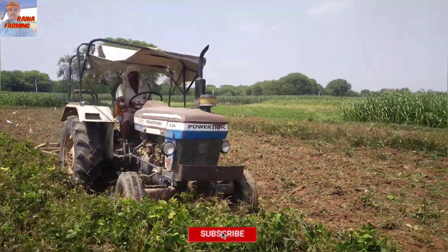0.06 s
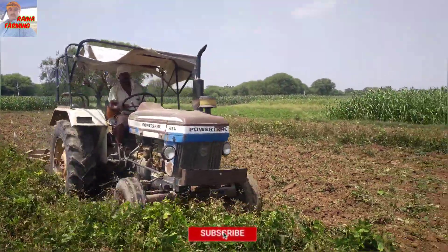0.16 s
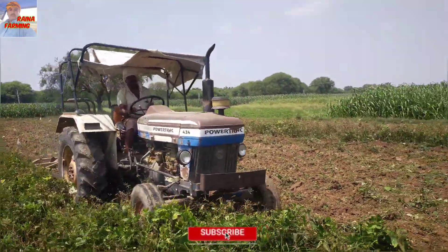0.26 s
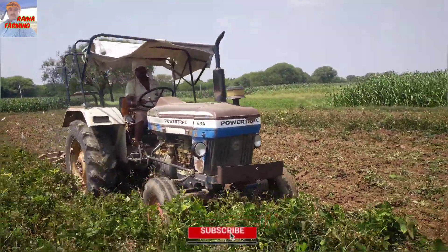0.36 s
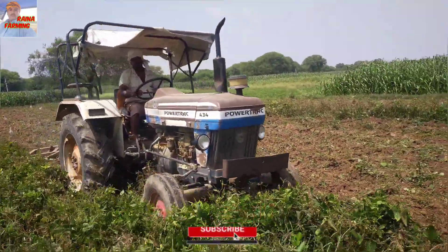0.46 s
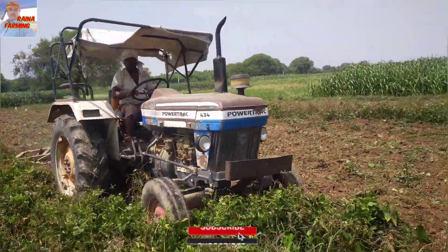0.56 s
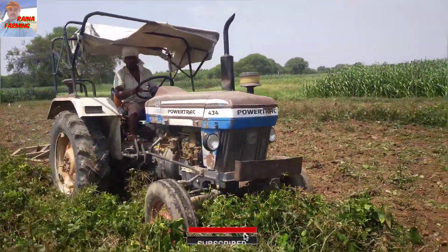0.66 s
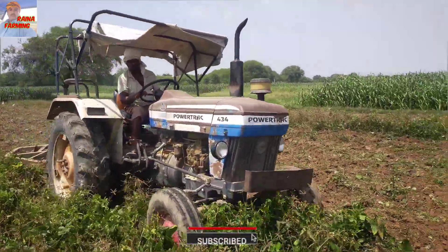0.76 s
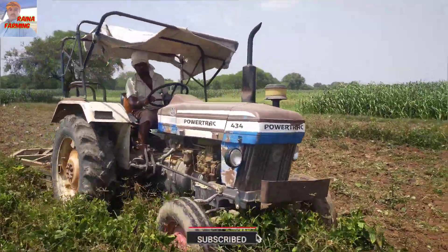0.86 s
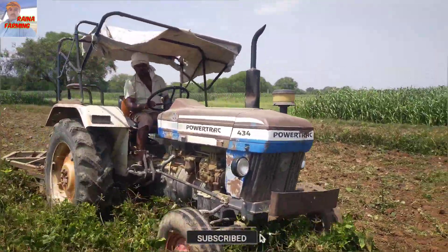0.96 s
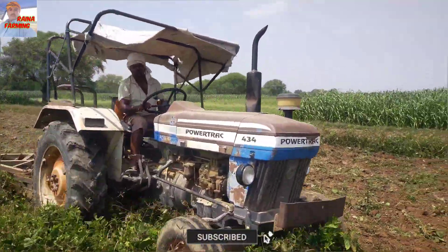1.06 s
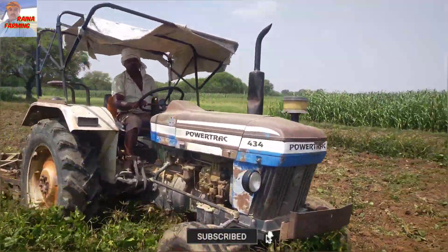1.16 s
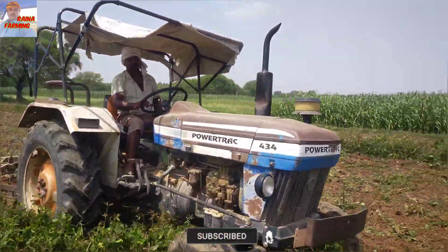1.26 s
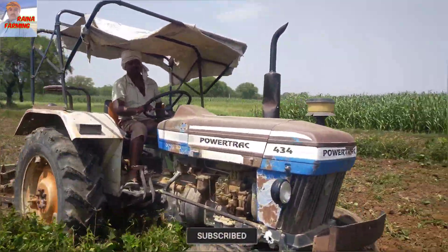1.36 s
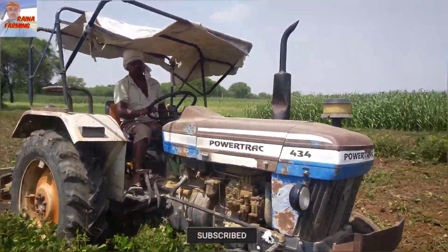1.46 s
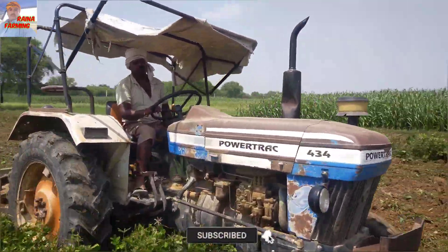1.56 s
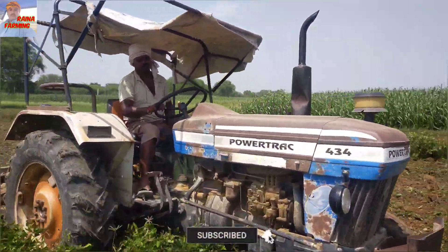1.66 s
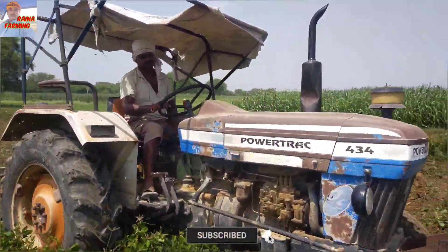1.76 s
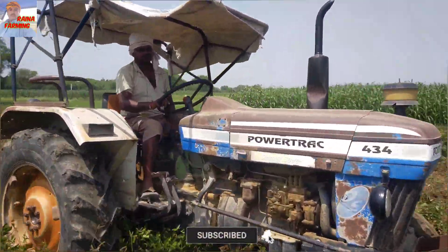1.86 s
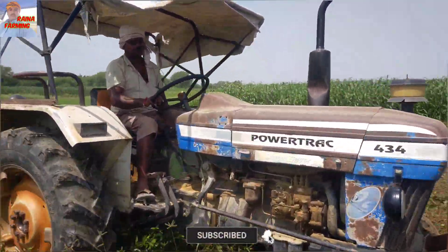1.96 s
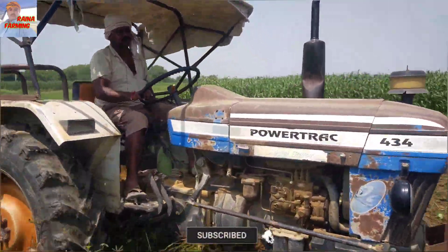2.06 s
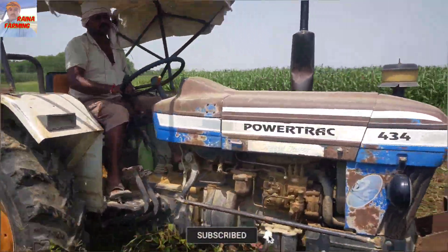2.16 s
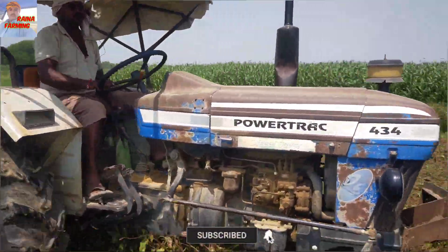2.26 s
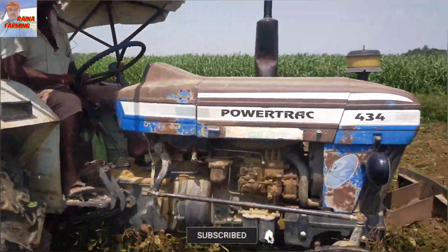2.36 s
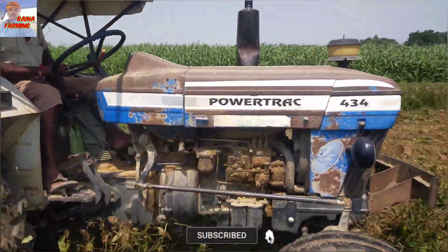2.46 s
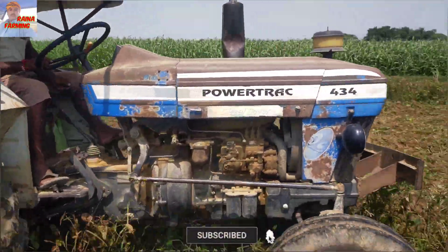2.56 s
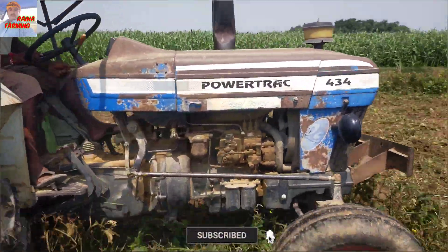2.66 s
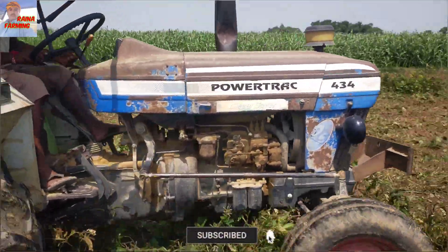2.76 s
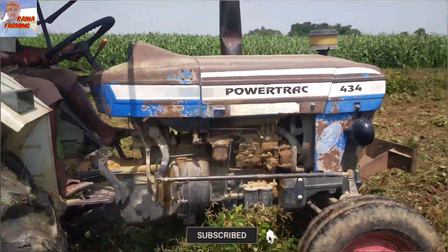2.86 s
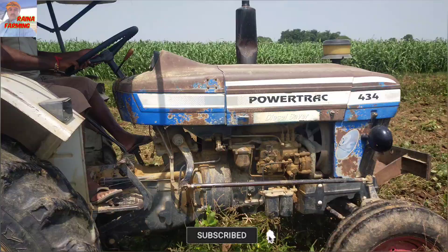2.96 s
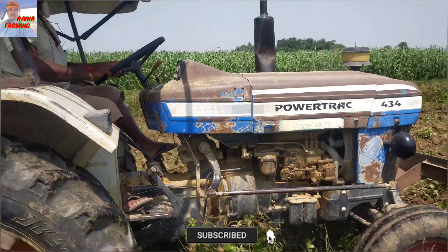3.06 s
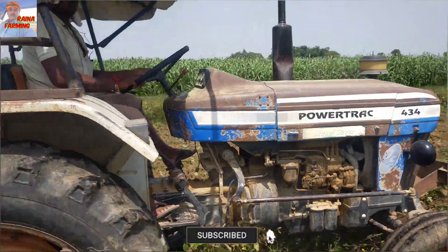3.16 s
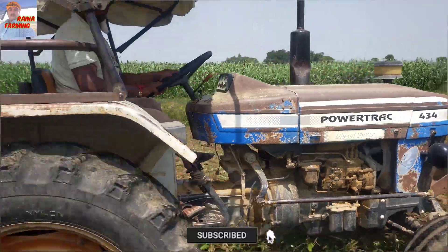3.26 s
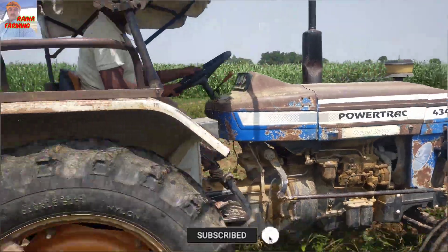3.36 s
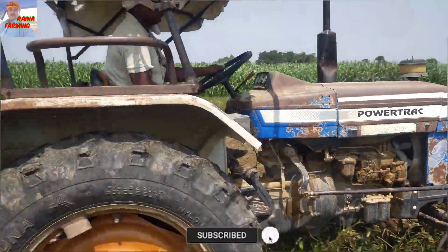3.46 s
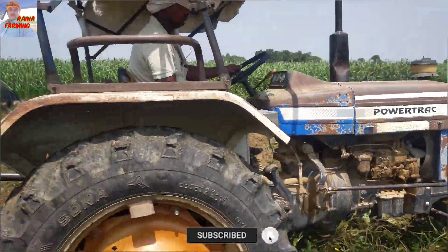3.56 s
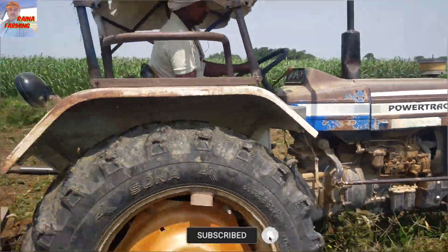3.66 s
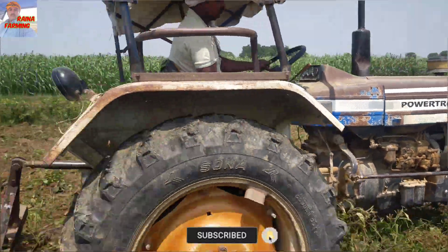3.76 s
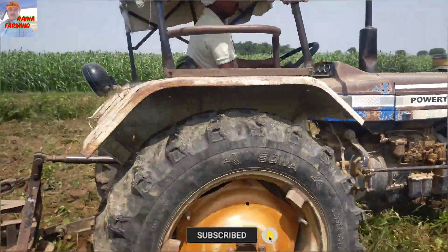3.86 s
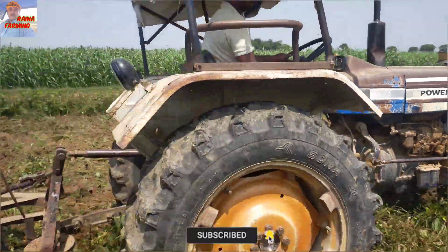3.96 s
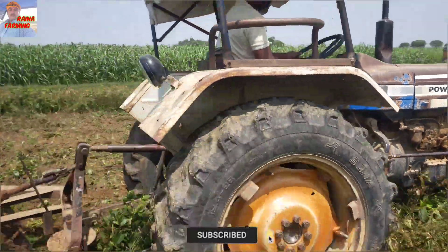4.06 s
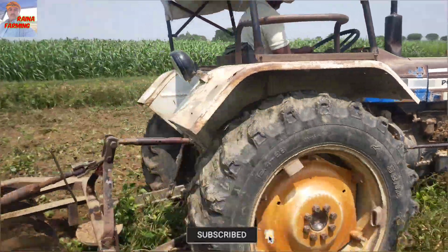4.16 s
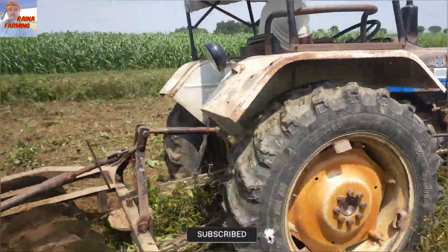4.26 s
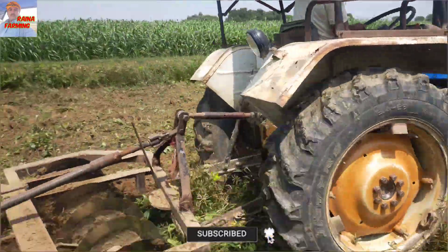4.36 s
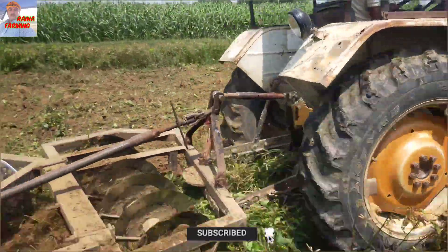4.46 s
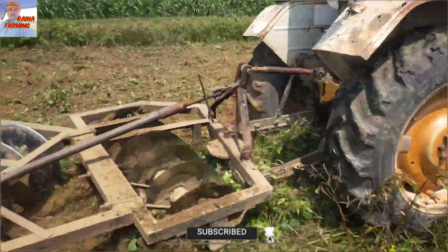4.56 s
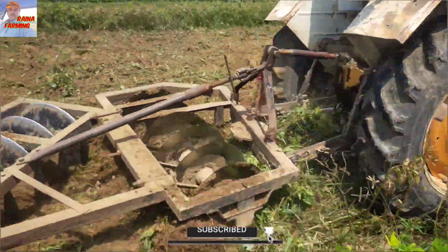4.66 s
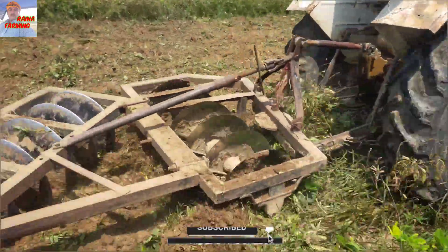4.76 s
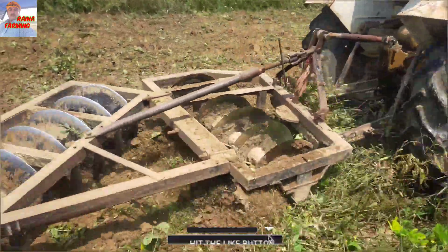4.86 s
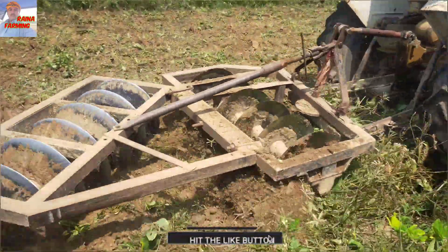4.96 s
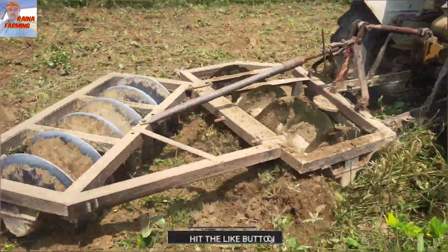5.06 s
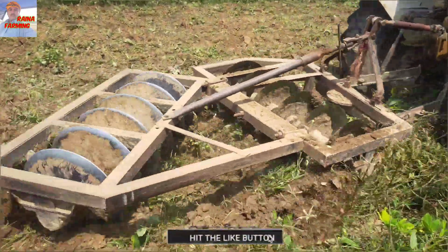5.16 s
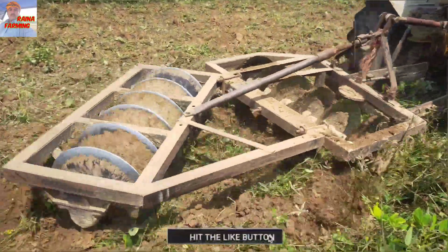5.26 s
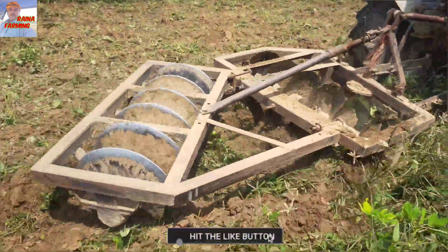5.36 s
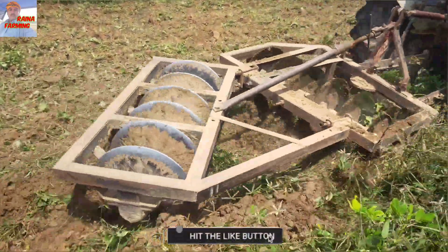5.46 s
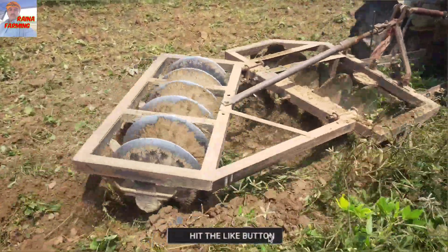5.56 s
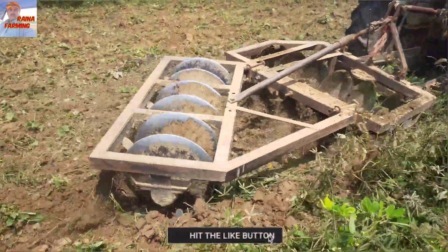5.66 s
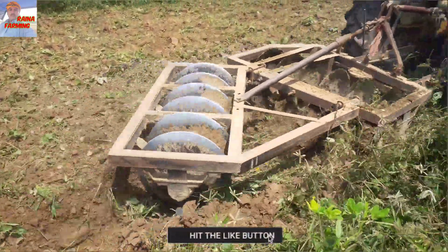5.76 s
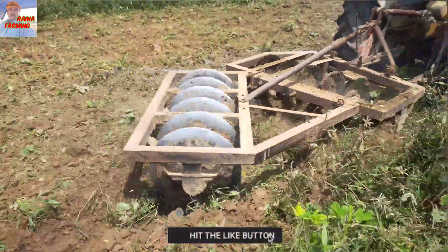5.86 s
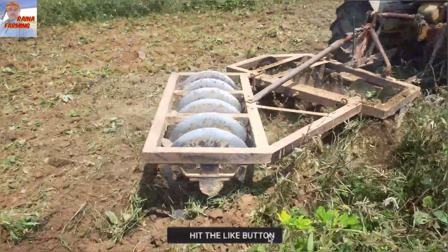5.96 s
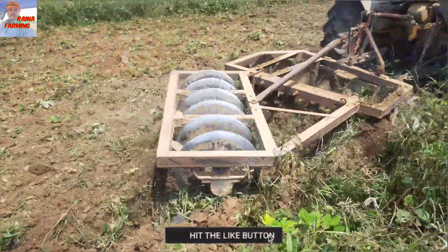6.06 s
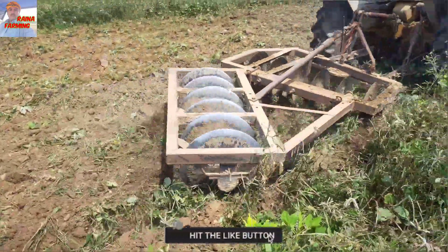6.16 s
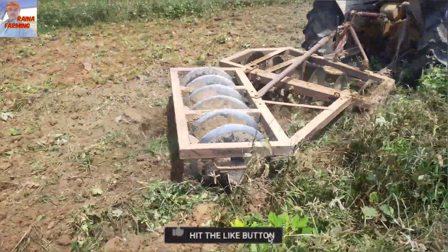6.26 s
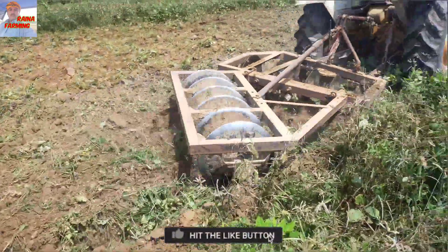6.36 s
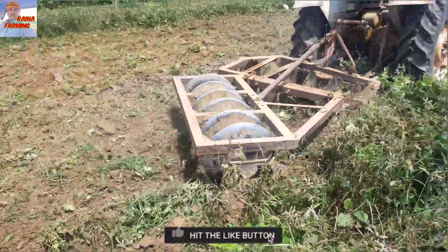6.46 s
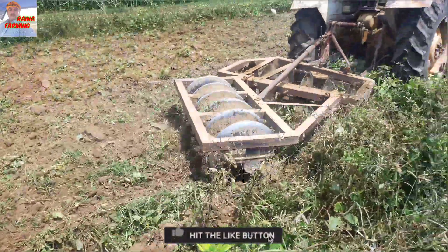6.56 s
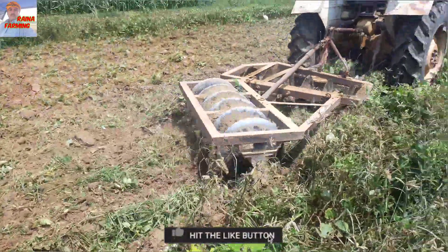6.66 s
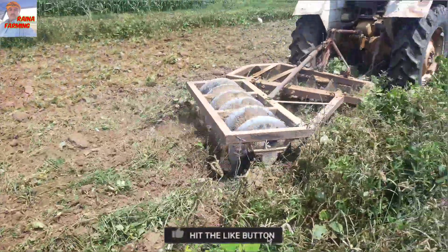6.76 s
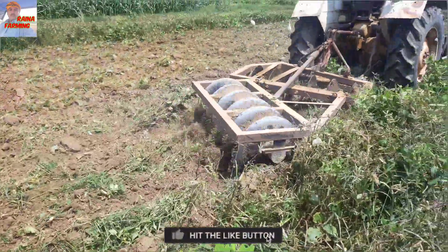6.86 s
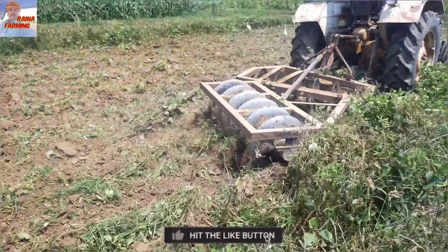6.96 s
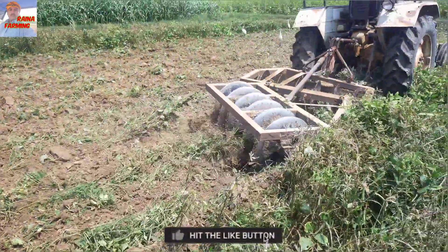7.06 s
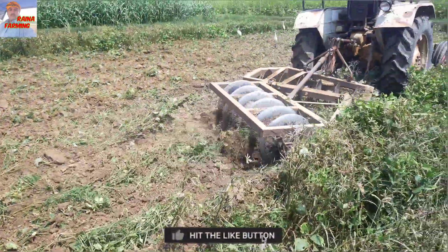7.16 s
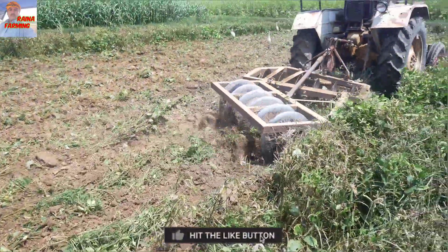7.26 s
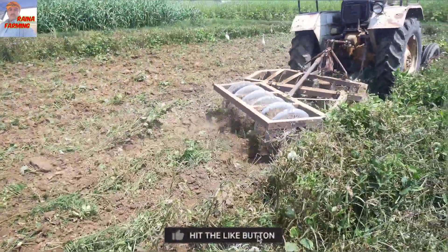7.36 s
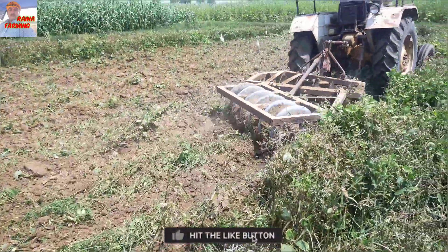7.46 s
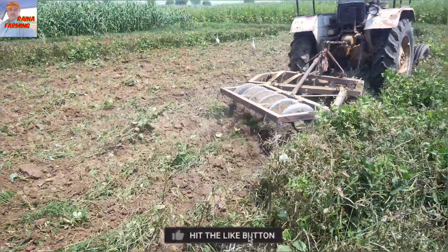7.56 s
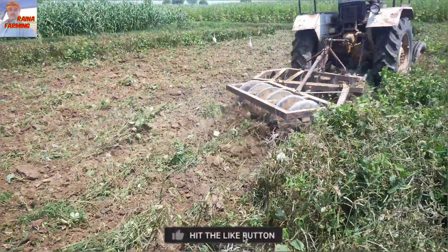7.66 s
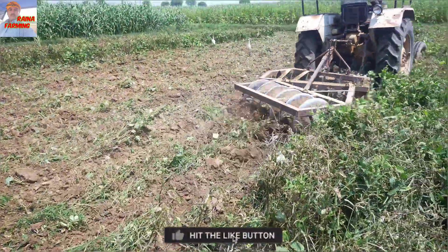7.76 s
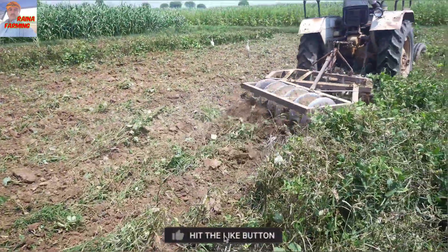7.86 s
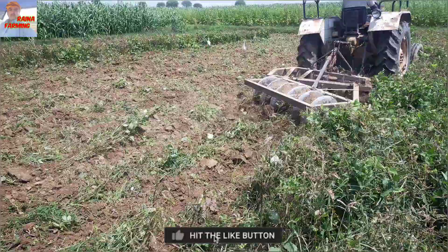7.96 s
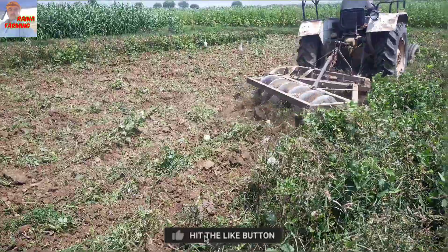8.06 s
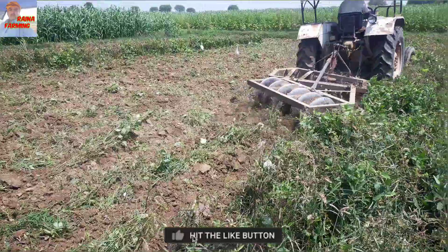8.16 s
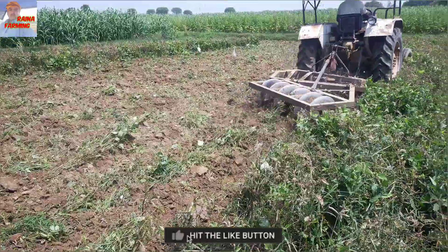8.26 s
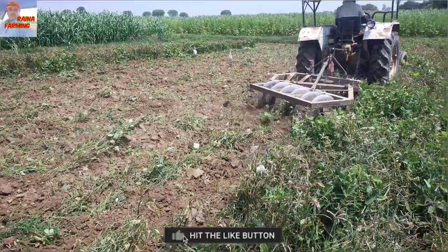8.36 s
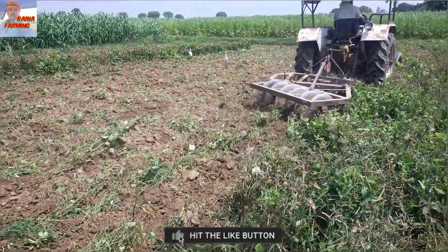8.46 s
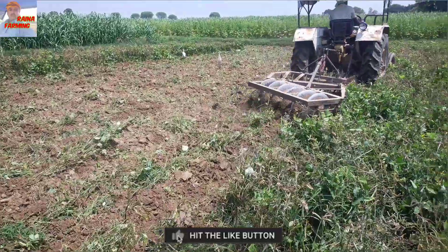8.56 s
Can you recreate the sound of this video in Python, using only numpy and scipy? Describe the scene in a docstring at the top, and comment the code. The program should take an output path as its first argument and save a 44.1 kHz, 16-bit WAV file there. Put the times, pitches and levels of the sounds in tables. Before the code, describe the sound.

A diesel tractor approaches across an open field at steady engine speed, its exhaust throbbing, its engine knocking rapidly and its gears whining. It passes close to the microphone with a little low wind buffeting. Behind it a disc harrow gives thin, high squeaks, clanks once on a stone and crumbles dry soil as the engine fades into the distance.

```python
"""A three-cylinder diesel tractor drives close past the microphone, pulling a disc harrow over dry soil.
Its exhaust throbs, the block knocks once per firing and the gears whine; the tone turns from nose to
flank to tail as it goes by. Behind it the discs crumble clods, a dry bearing squeaks thinly and one
disc clanks on a stone. Out in the open field, a little wind buffets the microphone."""
import sys
import numpy as np
from scipy import signal
from scipy.fft import rfft, irfft, next_fast_len
from scipy.io import wavfile
from scipy.ndimage import map_coordinates

SR = 44100
rng = np.random.default_rng(int(sys.argv[2]) if len(sys.argv) > 2 else 0)


def file_out(sig):
    """Save sig as 16-bit WAV at sys.argv[1]."""
    # one column per channel
    cols = np.atleast_2d(sig).T
    # limit, then scale
    lim = np.clip(cols, -1, 1)
    pcm = np.round(lim * 32767).astype(np.int16)
    wavfile.write(sys.argv[1], SR, pcm)


N = 379260

# Engine speed. Each row: time in seconds, firings per second.
FIRING_RATE = [(0.0, 40.8), (1.18, 40.89), (1.45, 41.74), (1.94, 41.14), (2.51, 41.7), (2.98, 40.53),
               (3.23, 41.19), (3.6, 40.49), (4.35, 41.12), (4.74, 40.35), (5.46, 41.06), (5.86, 40.54),
               (6.43, 41.56), (6.87, 40.54), (7.08, 41.01), (7.54, 40.16), (7.94, 41.22), (8.6, 40.02)]
# The exhaust's tones, as multiples of the firing rate.
EXHAUST_ORDERS = [1, 2, 3, 4, 5, 7]
# Those tones at the microphone, one per row. Each row: distant level in dB, swell in dB, its time and
# half-width in seconds, dip in dB, its time and half-width in seconds.
EXHAUST_BEAMS = [(-42, 7, 2.8, 4.2, 7, 3.5, .6), (-32.5, 3.5, 0.23, 0.69, 8, 2.35, .55),
                 (-44.5, 8.5, 2.25, 2.5, 11, 5, 0.6), (-47.5, 13.5, 2.67, 2.76, 17, 3.57, 0.78),
                 (-58, 31.5, 3.0, 2.3, 11.5, 2.95, .72), (-55, 26, 3.4, 1.6, 18, 2.67, 0.99)]
# Blows in one working cycle of three firings. Each row: position in firings, relative level in dB.
BLOWS = [(0.05, 2.5), (0.35, -14), (0.99, 4.5), (1.22, -15), (2.03, 3), (2.55, -4)]
# The block's drone and hiss, then its knock from ahead, alongside, behind and farther off.
# Each row: frequency in Hz, relative level in dB.
DRONE_SPECTRUM = [(20, -22), (50, -4), (95, -4), (115, -4), (160, -2.5), (240, -2), (310, 0), (450, -1.5),
                  (590, -1), (660, -14), (800, -33)]
HISS_SPECTRUM = [(3000, -12), (6000, -2), (8500, -16), (9500, -6.5), (11000, 0.5), (13000, 1),
                 (15400, -1.5)]
KNOCK_NOSE = [(400, -55), (660, -27.5), (850, -11.5), (1030, -6), (1150, -8.5), (1330, -1.5), (1550, -12.5),
              (1840, -14), (2100, -9.5), (2500, -12), (3980, -29), (6140, -31), (8000, -44), (12000, -84)]
KNOCK_FLANK = [(380, -44), (640, -14.5), (750, -14), (907, -5), (1020, -4), (1270, -2), (1570, -7),
               (1780, -6), (2200, -10), (2640, -12), (2960, -17), (3470, -18.5), (3860, -24.5),
               (4400, -24.5), (5830, -27), (8000, -42), (10400, -64), (17600, -120)]
KNOCK_TAIL = [(380, -18), (640, -2), (742, -16.5), (816, -11), (851, -0.5), (898, -7), (926, -2.5),
              (1210, -1), (1510, -3.5), (1820, 0), (2610, -8.5), (3860, -22), (4400, -23.5), (5240, -21),
              (8000, -31), (10400, -61), (17600, -120)]
KNOCK_AWAY = [(380, -53), (640, -30), (668, -16.5), (842, -6), (917, -8), (1120, -3.5), (1370, -10.5),
              (1710, -13.5), (1880, -20.5), (2420, -15), (3330, -27.5), (5590, -35), (6010, -26.5),
              (8000, -47), (10400, -76), (17600, -120)]
# The knock turns to flank, to tail, to farther off. Each row: start and end in seconds.
TURNS = [(1.1, 1.2), (4.1, 6), (5.9, 7.1)]
# The block going by; wheels and harrow screen it from behind, so it fades faster than it came.
# Each lists: level alongside in dB, start and end of that stretch in seconds, seconds for the last
# 3 dB of the approach, seconds for the first 3 dB of leaving.
DRONE_PASS = (-27, 2.5, 4.5, 1.5, 0.74)
KNOCK_PASS = (-19, 0.9, 4, 1.3, 0.744)
HISS_PASS = (-36.7, 2, 4.5, 1.8, 0.7)
# The block's level dips briefly. Each row: time in seconds, half-width in seconds, depth in dB.
BLOCK_DIPS = [(1.37, 0.051, 3), (2.03, .1, 1.5), (2.66, 0.11, 2)]
# Gear whines swell and fade in turn as the tractor goes by. Each row: time in seconds, half-width in seconds, #
# level in dB, approximate pitch in Hz.
GEAR_WHINES = [(1.3, 0.71, -36, 877), (1.6, 0.29, -34, 553), (1.85, .2, -34, 880), (1.9, 0.22, -30.5, 917),
               (2.45, 0.28, -28, 920), (2.8, 0.31, -32.5, 546), (3.7, 0.42, -37, 541),
               (4.05, 0.4, -30.5, 877.6), (5.45, 0.97, -36.5, 534), (5.75, 0.5, -34.5, 869),
               (5.9, .6, -41, 581), (8.45, 0.45, -41.5, 860)]
# The front cover's ring, loudest from ahead. It lists: distant level in dB, swell in dB, its time and
# half-width in seconds.
COVER_SWELL = (-62, 37.5, 0.96, 3)
# Crumbling soil, loudest as the harrow passes. Each row: time in seconds, level in dB.
SOIL_LEVEL = [(0, -58), (3.5, -47), (5, -59), (6.8, -33), (7.3, -41.5), (8.6, -61)]
# Gusts on the microphone. Each row: time in seconds, half-width in seconds, level in dB.
GUSTS = [(.5, .4, -43), (3.35, .22, -33), (3.87, .2, -33), (7.3, .15, -50)]
# Bearing squeaks. Each row: start in seconds, length in seconds, level in dB, centre pitch in Hz.
SQUEAKS = [(1.55, .05, -45.5, 9964), (2.452, .055, -40, 10000), (3.67, 0.15, -37, 9937),
           (3.99, 0.07, -29, 9940), (4.532, .15, -36.5, 9898), (5.063, 0.022, -35, 9941),
           (5.791, 0.028, -40, 9893), (5.886, 0.074, -31, 9850), (6.876, .11, -33, 9920),
           (7.406, 0.064, -45.5, 9894), (7.731, 0.058, -31.5, 9893)]
# The stone's contacts with a disc. Each row: start in seconds, ring gain in dB, thud gain in dB.
STONE_HITS = [(6.572, -29, -26), (6.580, -28.5, -17.5), (6.588, -24, -22), (6.594, -19, -25),
              (6.598, -18, -33), (6.64, -34, -32)]
# Modes of that disc. Each row: frequency in Hz, relative level in dB, seconds to fall by 60 dB.
DISC_MODES = [(2140, -10, 0.066), (2380, -8, 0.077), (2600, -2, 0.032), (2940, -4.5, 0.033),
              (4330, -10, .02)]

COVER_TEETH = 94  # tooth contacts per working cycle
BREEZE_DB, SQUEAK_RISE_HZ, TOP_HZ = -57, 50, 15500


def amp(db):
    """Decibels to gain."""
    return 10 ** (np.asarray(db) / 20)


def unit(x):
    """x at rms 1."""
    return x / np.sqrt(np.mean(x ** 2) + 1e-20)


def curve(points):
    """(seconds, value) points joined into one value per sample."""
    return np.interp(np.arange(N) / SR, *np.transpose(points))


def bell(at_s, width_s):
    """A smooth hump of height 1 in time."""
    return np.exp(-((np.arange(N) / SR - at_s) / width_s) ** 2)


def wobble(rate):
    """A smooth random curve, rate knots a second."""
    return map_coordinates(rng.standard_normal(int(N * rate / SR) + 4), [np.arange(N) * rate / SR])


def filtered(x, response):
    """x through a filter whose gain is response(hz)."""
    size = next_fast_len(N + SR // 2)
    return irfft(rfft(x, size) * response(np.fft.rfftfreq(size, 1 / SR)), size)[:N]


def coloured(x, spectrum):
    """x shaped by (Hz, dB) points joined on a log axis, at rms 1."""
    points_hz, db = np.transpose(spectrum)
    return unit(filtered(x, lambda hz: amp(np.interp(np.log(hz + 1), np.log(points_hz + 1), db))))


def beam(far_db, swell_db, swell_s, swell_width_s, dip_db, dip_s, dip_width_s):
    """Gain of a tone that swells as it faces the microphone and sinks once where its paths cancel."""
    return amp(far_db + swell_db * bell(swell_s, swell_width_s) - dip_db * bell(dip_s, dip_width_s))


def exhaust(crank):
    """The pipe throbs on low multiples of the firing rate, each a little unsteady."""
    def tone(order):
        phase = 2 * np.pi * order * (crank - .32)  # the valve opens after the firing
        return np.sqrt(2) * np.cos(phase + 0.091 * wobble(8.2)) * amp(1.25 * wobble(7))

    gains = [beam(*row) for row in EXHAUST_BEAMS]
    throb = sum(gain * tone(order) for order, gain in zip(EXHAUST_ORDERS, gains))
    return throb + amp(-5.5) * gains[2] * tone(7 / 3)  # unequal cylinders add a tone between the orders


def strike(crank, at, decay, rise=0.096):
    """Envelope of a blow that returns every working cycle; times in firings."""
    age = (crank - at) % 3
    return (1 - np.exp(-age / rise)) * np.exp(-age / decay)


def hammering(crank, decay, floor_db, scatter_db):
    """Envelope of all the cycle's blows, varying in strength, over a floor of lasting vibration."""
    power = sum((amp(db) * strike(crank, at, decay)) ** 2 for at, db in BLOWS)
    return np.sqrt(power * amp(scatter_db * wobble(41)) ** 2 + amp(floor_db) ** 2)


def vibration(crank, repeat, angles=7):
    """Fine vibration: a share repeats each cycle, changing with the microphone's angle; the rest is new."""
    size = SR // 14
    place = (crank / 3 * size % size).astype(int)
    angle = np.linspace(0, angles - 1, N)
    weights = (np.sqrt(np.clip(1 - abs(angle - k), 0, 1)) for k in range(angles))
    cyclic = sum(weight * rng.standard_normal(size)[place] for weight in weights)
    return np.sqrt(repeat) * cyclic + np.sqrt(1 - repeat) * rng.standard_normal(N)


def casing(x, ripple_db=1.64):
    """Many small castings and panels ring: narrow peaks and dips across the upper spectrum."""
    modes_hz = np.arange(2000, 8000, 110)
    heights_db = ripple_db * rng.standard_normal(len(modes_hz))
    return filtered(x, lambda hz: amp(np.interp(hz, modes_hz, heights_db, left=0, right=0)))


def knock(crank, low_hz=620, mid_hz=1650, high_hz=3300):
    """Each blow rings in the mids, clatters above and rattles on top; the tone turns as the block passes."""
    def above(hz, edge_hz):
        return np.clip(3 * (hz / edge_hz - 1) + .5, 0, 1)

    ring = vibration(crank, repeat=0.39) * hammering(crank + .03, 0.44, floor_db=0, scatter_db=1.1)
    clatter = vibration(crank, repeat=0.36) * hammering(crank - .02, 0.27, floor_db=-7.5, scatter_db=0.86)
    rattle = rng.standard_normal(N) * hammering(crank + 0.084, 0.28, floor_db=-5, scatter_db=1.4)
    blows = filtered(unit(ring), lambda hz: above(hz, low_hz) * np.sqrt(1 - above(hz, mid_hz)))
    blows += filtered(unit(clatter), lambda hz: np.sqrt(above(hz, mid_hz) - above(hz, high_hz)))
    blows += filtered(unit(rattle), lambda hz: np.sqrt(above(hz, high_hz)))
    screening = amp(-4.5 * strike(crank, 1.97, decay=0.65))  # from ahead the rear cylinder is half hidden
    heard = unit(coloured(casing(blows), KNOCK_NOSE) * screening)
    for (start, end), side in zip(TURNS, [KNOCK_FLANK, KNOCK_TAIL, KNOCK_AWAY]):
        turned = curve([(start, 0), (end, 1)])
        heard = (1 - turned) * heard + turned * coloured(casing(blows), side)
    return heard


def pass_by(db, from_s, to_s, approach_s, leave_s):
    """Gain of a long source passing the microphone: steady alongside, 1 / distance before and after."""
    t = np.arange(N) / SR
    offset = np.maximum(from_s - t, 0) / approach_s + np.maximum(t - to_s, 0) / leave_s
    return amp(db) / np.hypot(1, offset)


def block(crank):
    """Firings and valves shake the passing block: a low drone, the knock and a pulsing hiss."""
    shake = vibration(crank, repeat=0.45) * hammering(crank + 0.074, 0.25, floor_db=-3.5, scatter_db=1)
    drone = pass_by(*DRONE_PASS) * coloured(shake, DRONE_SPECTRUM)
    knocking = pass_by(*KNOCK_PASS) * knock(crank)
    pulsing = hammering(crank + .08, decay=.35, floor_db=-3, scatter_db=1.5)
    hiss = pass_by(*HISS_PASS) * coloured(rng.standard_normal(N) * pulsing, HISS_SPECTRUM)
    dips = amp(-sum(db * bell(at_s, width_s) for at_s, width_s, db in BLOCK_DIPS))
    return dips * (drone + knocking + hiss)


def injector(crank):
    """One injector ticks high and dry, once a cycle."""
    tick = rng.standard_normal(N) * strike(crank, 0.82, decay=.2) * amp(2.6 * wobble(14))
    return amp(-57.5) * coloured(tick, [(7000, -30), (11000, -6), (13800, 0), (15500, -5)])


def gears(crank):
    """Teeth sing on multiples of the cycle rate; the highest rings the cover at two firings in three."""
    def whine(teeth):
        phase = 2 * np.pi * teeth * cycle + .55 * wobble(16)
        return np.sqrt(2) * np.sin(phase) * amp(1.9 * wobble(6))

    cycle = crank / 3
    cycle_hz = np.gradient(cycle) * SR
    singing = np.zeros(N)
    for at_s, width_s, db, hz in GEAR_WHINES:
        teeth = round(hz / cycle_hz[min(int(at_s * SR), N - 1)])
        singing += amp(db) * bell(at_s, width_s) * whine(teeth)
    far_db, swell_db, at_s, width_s = COVER_SWELL
    pings = unit(.06 + strike(crank, -0.029, decay=0.41, rise=.08) + 0.97 * strike(crank, 0.97, decay=0.53))
    cover = amp(far_db + swell_db * bell(at_s, width_s)) * pings * whine(COVER_TEETH)
    return singing + cover


def soil(count=5000, grain_s=.0015):
    """Clods and stalks break under the discs in dry grains, many faint and a few loud."""
    when, rank = rng.random((count, 2)).T
    strengths = amp(-3.2 * np.log(rank * .99 + .01))
    cracks = np.bincount((when * (N - 1)).astype(int), strengths, N)
    grain = np.exp(-np.arange(SR // 50) / SR / grain_s)
    crunch = signal.fftconvolve(cracks, grain)[:N] * rng.standard_normal(N)
    spectrum = [(150, -18), (500, -6), (1700, 13), (3500, -10), (6000, -17), (8500, -28), (14000, -16)]
    return amp(curve(SOIL_LEVEL)) * coloured(crunch, spectrum)


def wind():
    """Soft deep buffets right on the microphone: a few gusts over a light breeze."""
    spectrum = [(6, -14), (15, 0), (30, 0), (60, -9), (150, -35), (600, -80)]
    rumble = coloured(rng.standard_normal(N), spectrum)
    strength = amp(BREEZE_DB) + sum(amp(db) * bell(at_s, width_s) for at_s, width_s, db in GUSTS)
    return strength * amp(2 * wobble(6.4)) * rumble


def bearing():
    """A dry disc bearing squeaks now and then on one thin, slightly rough, rising note."""
    t, out = np.arange(N) / SR, np.zeros(N)
    waver_hz, flutter = 24 * wobble(220), amp(4 * wobble(90))
    for start_s, length_s, db, hz in SQUEAKS:
        on = (t >= start_s) & (t <= start_s + length_s)
        swell = signal.windows.tukey(on.sum(), .35)
        pitch = hz + SQUEAK_RISE_HZ * np.linspace(-.5, .5, on.sum()) + waver_hz[on]
        out[on] += amp(db) * swell * np.sqrt(2) * np.sin(2 * np.pi * np.cumsum(pitch) / SR)
    return out * flutter


def stone(thud_t60_s=0.049, attack_s=0.00054):
    """A stone chatters against a steel disc, whose ring the soil damps."""
    t, out = np.arange(SR // 4) / SR, np.zeros(N)
    spectrum = [(300, -13), (1000, 7), (2600, -4), (4500, -15), (7000, -28), (12000, -29), (15000, -18)]
    grit = coloured(rng.standard_normal(N), spectrum)
    attack = 1 - np.exp(-t / attack_s)
    for start_s, ring_db, thud_db in STONE_HITS:
        start = round(start_s * SR)
        span = slice(start, start + len(t))
        ring = np.zeros(len(t))
        for hz, db, t60 in DISC_MODES:
            fade = amp(db + rng.normal(0, 1.9) - 60 * t / t60)
            ring += fade * np.sin(2 * np.pi * hz * t + rng.uniform(0, 2 * np.pi))
        thud = amp(-60 * t / thud_t60_s) * grit[span]
        out[span] += (amp(ring_db) * ring + amp(thud_db) * thud) * attack
    return out


def scene():
    """From one spot in the field: the tractor, all running off one crankshaft, its harrow and the wind."""
    crank = np.cumsum(curve(FIRING_RATE)) / SR  # firings so far
    tractor = exhaust(crank) + block(crank) + injector(crank) + gears(crank)
    harrow = soil() + bearing() + stone()
    return (tractor + harrow + wind())[None]


def record(dry):
    """One microphone channel, with nothing kept above TOP_HZ."""
    return filtered(dry[0], lambda hz: hz < TOP_HZ)[None]


dry = scene()
out = record(dry)
file_out(out)
```